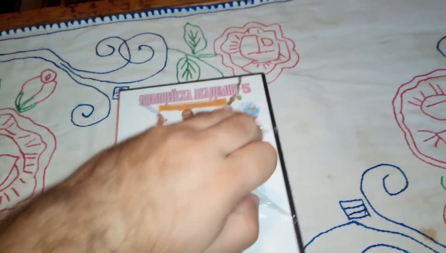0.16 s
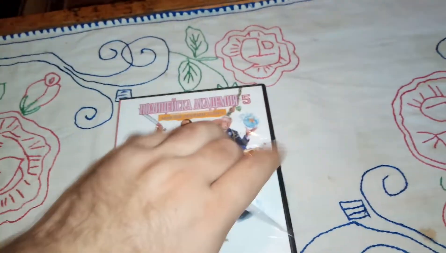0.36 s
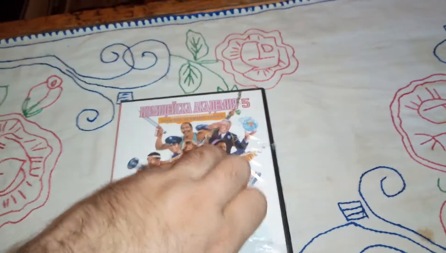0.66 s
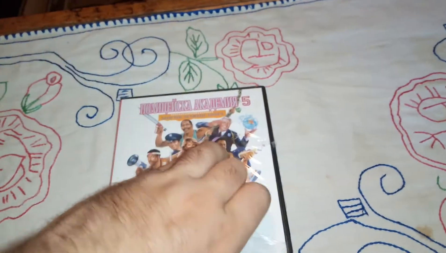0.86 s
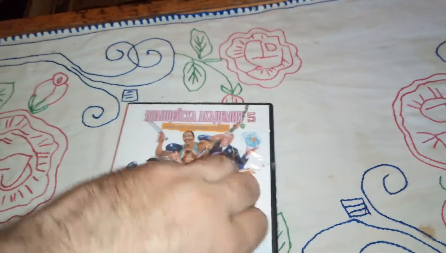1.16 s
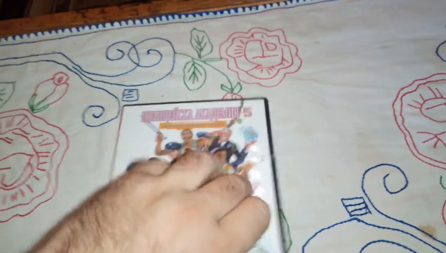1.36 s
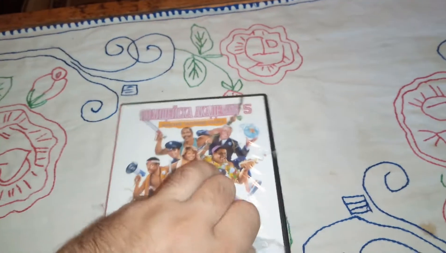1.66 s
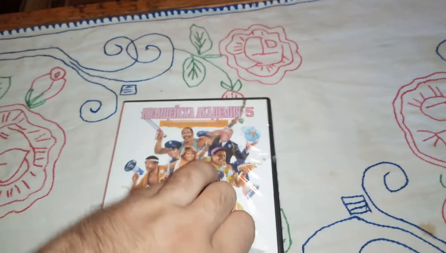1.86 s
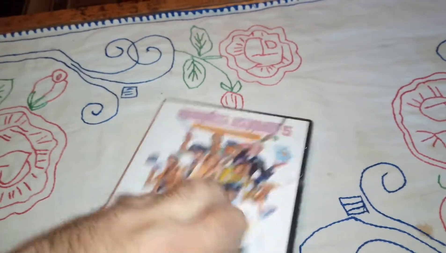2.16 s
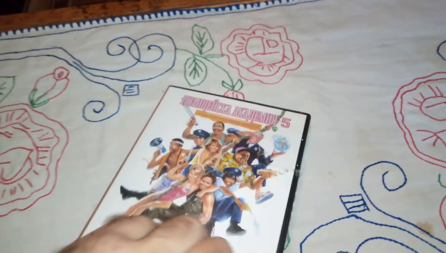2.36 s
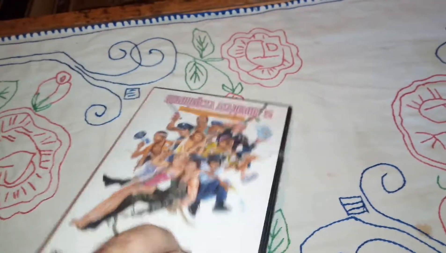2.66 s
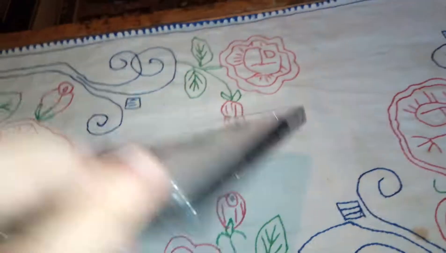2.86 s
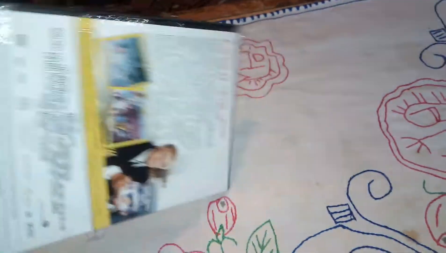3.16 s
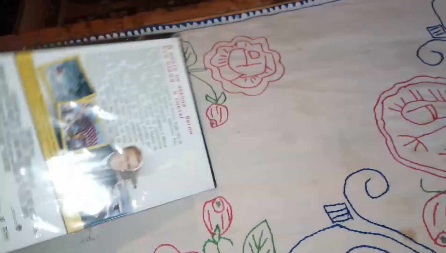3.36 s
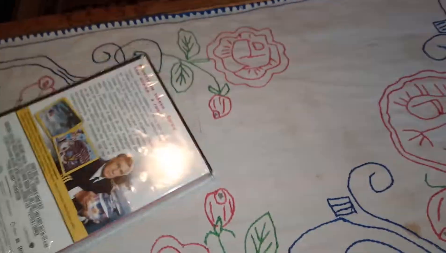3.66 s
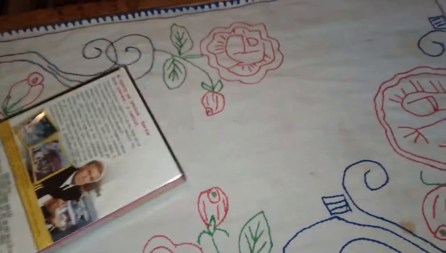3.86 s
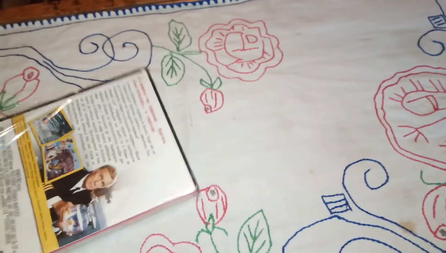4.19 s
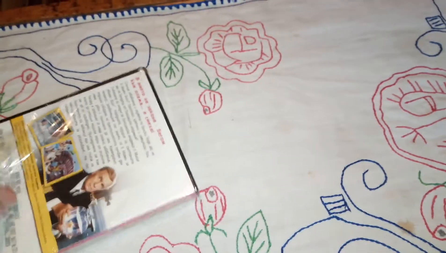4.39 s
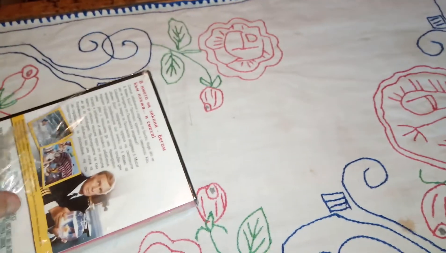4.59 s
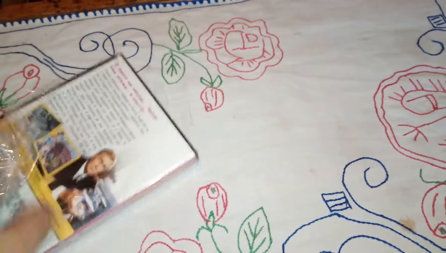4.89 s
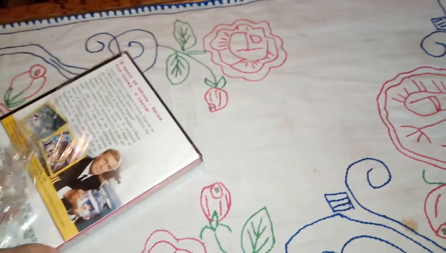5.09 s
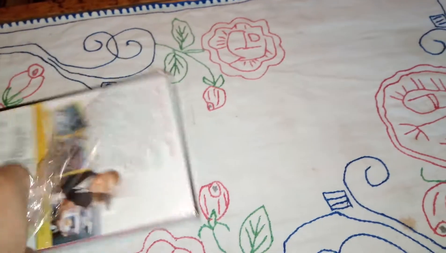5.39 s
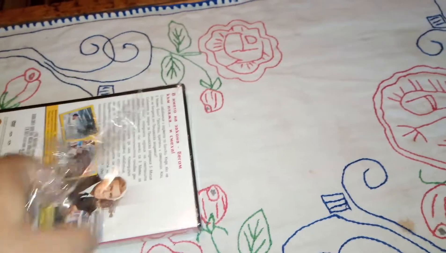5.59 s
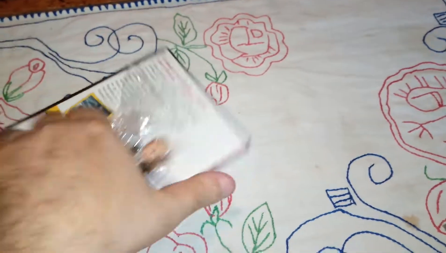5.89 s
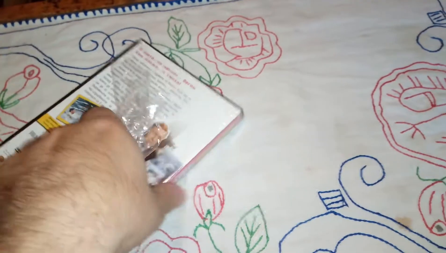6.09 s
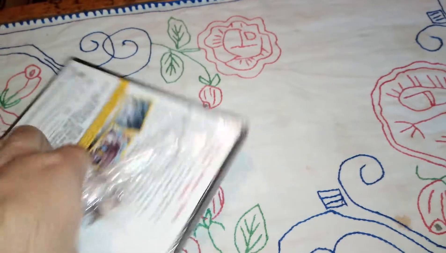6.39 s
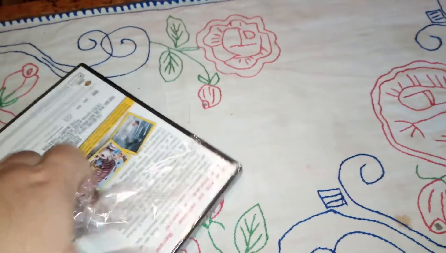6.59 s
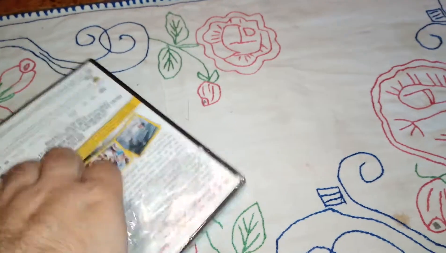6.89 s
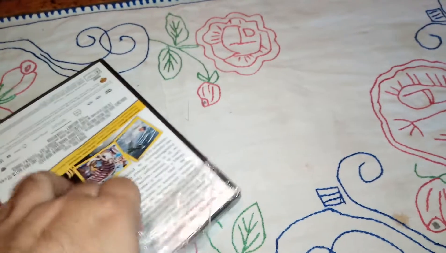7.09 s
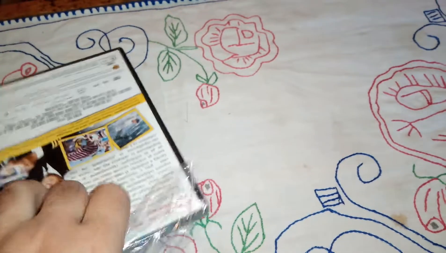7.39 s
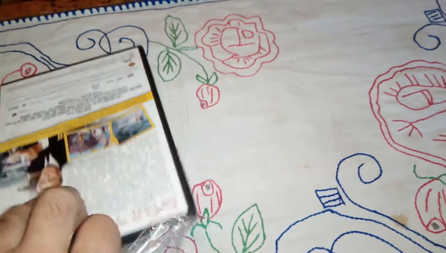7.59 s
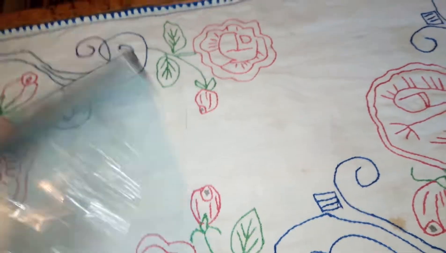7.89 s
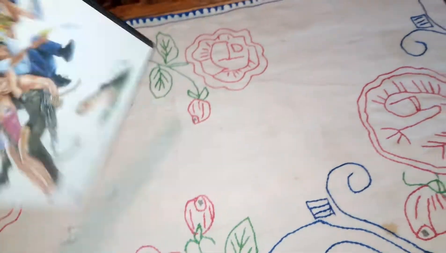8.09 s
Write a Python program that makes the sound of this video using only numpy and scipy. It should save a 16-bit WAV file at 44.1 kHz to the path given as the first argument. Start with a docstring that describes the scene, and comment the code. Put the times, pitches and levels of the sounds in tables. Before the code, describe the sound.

Hands work thin plastic film on a hollow plastic case in a quiet, small room. Sparse faint crinkles and soft rubs come first, then case clacks and brighter crackles. The crinkling grows dense and loud in the second half, with sharp snaps and one hard pop with a puff of air on the microphone just past the middle. Small, close microphone, dry sound.

```python
"""Fine crinkle in a quiet, small, dry room: hands peel shrink-wrap off a plastic disc case, close to a small microphone.
Creased film is noise under random-buckle envelopes; sharp snaps are short bursts that also ring the case.
Slipping film squeaks and swishes as roughened tones. The case slides and knocks on a cloth-covered table:
noise through shell and table resonances. One pop strikes the microphone with a puff of air."""
import sys
import numpy as np
from scipy import signal
from scipy.fft import rfft, irfft, next_fast_len
from scipy.io import wavfile
from scipy.ndimage import uniform_filter1d

SR = 44100
rng = np.random.default_rng(int(sys.argv[2]) if len(sys.argv) > 2 else 0)


def wrap_up_sound(samples):
    """Save the sound to the file named by the first command line argument, as 16-bit audio."""
    columns = np.atleast_2d(samples).T
    # keep every value between -1 and 1, then stretch to whole-number steps
    tamed = np.clip(columns, -1, 1)
    steps = np.round(tamed * 32767).astype(np.int16)
    wavfile.write(sys.argv[1], SR, steps)


N = 363686
TOP_HZ = 16300  # end of the band

# loud buckles of the film: start_s, level_db, centre_hz, breadth_octaves (Gaussian sigma)
LOUD_BUCKLES = [(0.02, -35, 4990, 2), (.134, -26.5, 2400, 4.2), (.166, -32.5, 13000, 1.7),
                (0.2846, -20.5, 5230, 0.62), (.295, -31, 12000, 2), (.302, -29, 3290, 1.6),
                (.632, -33, 3220, 3.5), (0.654, -27, 11000, 0.9), (.663, -25, 14000, 1.75),
                (.757, -26, 1760, 1.6), (.91, -27, 13850, 3.5), (.928, -26, 14000, 2.1),
                (1.139, -20, 3360, 1.24), (1.355, -27, 14000, 0.47), (1.3852, -24, 6320, 3.1),
                (1.509, -20, 700, 1.2), (1.514, -21, 840, 1.5), (1.535, -24, 3900, 3.5),
                (1.627, -22, 700, 1.9), (1.6354, -25.5, 1110, 0.93), (1.654, -22.5, 1790, 0.61),
                (1.7292, -22.5, 14000, 1.2), (1.8324, -31.5, 5600, 2.9), (1.916, -32, 5350, 1.6),
                (2.091, -36, 7100, 4.6), (2.117, -25.5, 13400, 0.55), (2.154, -24, 8100, 1.5),
                (2.16, -34, 5000, 2.2), (2.184, -22.5, 14000, 2.4), (2.206, -24.5, 9700, 8.1),
                (2.238, -15.5, 1590, 0.93), (2.262, -18.5, 1910, 0.6), (2.302, -27, 11000, 2),
                (2.353, -23, 14000, 1.5), (2.379, -23, 8640, 3), (2.39, -23, 14000, 1.3),
                (2.41, -27, 12000, 2.4), (2.426, -23, 14000, 2.2), (2.46, -30, 14000, 1.9),
                (2.4977, -25, 2700, 1.6), (2.5016, -21, 9000, 3.9), (2.546, -24.5, 13500, 0.68),
                (2.6778, -15.5, 1090, 1.1), (2.7534, -23, 9100, 2.8), (2.783, -29, 11000, 1.5),
                (2.833, -26, 11960, 2.9), (2.911, -19.5, 1900, 1.6), (2.937, -25, 700, 2),
                (2.952, -28, 14000, 1.7), (2.956, -24.5, 2500, 2.2), (3.045, -32, 13000, 1),
                (3.086, -20.5, 1630, 1.1), (3.124, -32, 13900, 2), (3.133, -24.5, 1620, 1.54),
                (3.205, -37, 9000, 2), (3.306, -27, 2740, 1.1), (3.315, -25.5, 3000, .5),
                (3.399, -23, 3060, 1.02), (3.435, -23.5, 3650, 2.2), (3.558, -22, 3870, 1),
                (3.575, -20, 2460, 0.84), (3.667, -30.5, 5300, 1.7), (3.7, -31.5, 14000, 1.9),
                (3.759, -19, 2030, 0.87), (3.7952, -21, 2060, 1), (3.8023, -14.5, 10000, 5),
                (4.033, -22.5, 2000, 1.4), (4.0363, -21.5, 2450, 1.56), (4.055, -27, 5300, .9),
                (4.1223, -25, 5600, 2), (4.186, -16.5, 1750, 0.56), (4.209, -28, 2370, .75),
                (4.2899, -33, 1000, 1.2), (4.4014, -22.5, 2090, 0.92), (4.45, -26, 8600, .4),
                (4.5121, -21.5, 1930, 0.65), (4.528, -19.5, 2400, 1.24), (4.578, -12.5, 2050, 1.26),
                (4.596, -20.5, 1210, 0.58), (4.643, -21.5, 905, 1.6), (4.662, -23.5, 3000, 0.86),
                (4.713, -20.5, 2500, 2.1), (4.754, -23, 3000, 1.2), (4.803, -19, 1560, 1.15),
                (4.8718, -17, 1890, 1.1), (4.909, -17.5, 1660, 1.08), (5.031, -21.5, 4700, 1.1),
                (5.0745, -21, 4400, 1.1), (5.123, -13.5, 1120, 1.55), (5.145, -19.5, 1900, 0.67),
                (5.199, -12, 960, 2.1), (5.214, -19, 3020, .65), (5.255, -10.5, 1560, 1.9),
                (5.2596, -19, 1820, 2.2), (5.265, -19.5, 700, 1.3), (5.27, -16, 1600, 2.4),
                (5.2765, -22, 2210, 1.3), (5.282, -25, 3500, 1.4), (5.355, -29, 9700, 3.2),
                (5.44, -18, 3030, 3.3), (5.465, -20.5, 5400, 0.66), (5.52, -20.5, 4480, 3.4),
                (5.646, -25.5, 14000, 0.41), (5.6689, -30, 1500, 3.2), (5.687, -21.5, 1800, 1.1),
                (5.701, -21, 6300, 0.44), (5.736, -17.5, 3200, 3.4), (5.744, -20.5, 5000, 0.41),
                (5.793, -19.5, 750, 0.48), (5.877, -18.5, 4050, 0.27), (5.94, -19.5, 4400, 0.6),
                (5.9865, -22, 1190, 2.2), (6.1118, -21, 2940, 1.2), (6.161, -19, 3250, 0.78),
                (6.188, -28, 7100, 1.8), (6.2353, -17, 1800, 1.44), (6.262, -23.5, 1820, 0.97),
                (6.27, -18, 2240, 0.89), (6.2761, -20, 1520, 1.5), (6.29, -20, 1800, 1.7),
                (6.318, -17, 5000, 0.79), (6.3582, -18, 960, 1.9), (6.37, -17.5, 1120, 2),
                (6.393, -15.5, 1300, 1.9), (6.396, -16, 2650, 0.25), (6.477, -25, 1997, 1.2),
                (6.529, -22.5, 1400, 1.1), (6.6075, -21, 6960, 1.2), (6.629, -26, 890, 1.2),
                (6.676, -22.5, 7060, 2.8), (6.735, -26.5, 5040, 0.83), (6.768, -29.5, 2900, 1.3),
                (6.866, -23.5, 1880, 1.2), (6.954, -16.5, 2950, 1.1), (6.971, -13, 2880, 1.4),
                (6.995, -16, 2900, 1.1), (7.015, -19.5, 2980, 4.8), (7.045, -22.5, 1500, 2.5),
                (7.1003, -21.5, 2000, 1.8), (7.11, -18.5, 3900, 1.6), (7.168, -20, 780, 1.8),
                (7.1927, -27, 2700, 2.8), (7.216, -14.5, 7600, 1.4), (7.223, -16, 2200, 2.1),
                (7.232, -20, 1330, 0.36), (7.25, -17, 6700, 3.4), (7.28, -20.5, 1200, 1.8),
                (7.303, -22, 1510, 2.4), (7.318, -20, 2080, 1.26), (7.3766, -21, 1410, 0.77),
                (7.4555, -28, 13000, 2.4), (7.509, -17.5, 5300, 3.2), (7.5505, -15.5, 4400, 0.72),
                (7.5588, -23, 3520, 1.3), (7.6096, -16, 2700, 5), (7.692, -21.5, 4100, 2.5),
                (7.708, -22.5, 14000, 1.3), (7.881, -21, 4200, 1.2), (7.9244, -18, 3200, 1.2),
                (7.983, -23, 3000, 1.04), (8.107, -27, 5000, 1.4), (8.136, -29, 2700, 0.57),
                (8.177, -28, 13900, 2.6)]
# resonances of the hollow case: centre_hz, width_hz, level_db
SHELL_MODES = [(449, 56, -4), (642, 74, 2.5), (772, 136, -0.5), (1137, 80, -4.5), (1446, 105, -12),
               (1840, 70, -6), (2300, 45, -7), (2950, 44, -4.5), (3624, 85, -3), (4900, 1440, -19.5)]
# resonances of the table under its cloth: centre_hz, width_hz, level_db
TABLE_MODES = [(90.4, 14.6, -1.5), (138, 16.3, 0.5), (198, 35, -4.5), (273.6, 38, -4), (345, 45, -13),
               (422, 45, -12)]


def amp(db):
    """Decibels to gain."""
    return 10 ** (np.asarray(db) / 20)


def unit(x):
    """Scale to rms 1."""
    return x / np.sqrt(np.mean(x ** 2) + 1e-20)


def sized(x, span_s):
    """Scale a short sound to the energy of rms 1 held for span_s."""
    return x / np.sqrt(np.sum(x ** 2) / (span_s * SR) + 1e-20)


def along(points, hz):
    """Interpolate (Hz, value) points on a log axis."""
    f, v = np.transpose(points)
    return np.interp(np.log(hz + 1), np.log(f + 1), v)


def curves(rows):
    """One value per sample for each column after the time."""
    s, *cols = np.transpose(rows)
    return [np.interp(np.arange(N) / SR, s, c) for c in cols]


def add(track, s, sound):
    """Mix a sound into the track at time s."""
    part = track[max(0, round(s * SR)):][:len(sound)]
    part += sound[:len(part)]


def filtered(x, response):
    """x times a complex response of frequency."""
    m = 2 * next_fast_len(N // 2 + SR // 4)
    return irfft(rfft(x, m) * response(np.fft.rfftfreq(m, 1 / SR)), m)[:N]


def causal(gain):
    """Minimum-phase response with this gain: sharp attack, ringing after it."""
    cepstrum = irfft(np.log(np.maximum(gain, 1e-6)))
    half = len(cepstrum) // 2
    return np.exp(rfft(np.r_[cepstrum[0], 2 * cepstrum[1:half], np.zeros(half)]))


def body(modes, hz):
    """Sum of band-pass resonances of alternating sign."""
    total = 0
    for k, (c, w, db) in enumerate(modes):
        total = total + (-1) ** k * amp(db) * 1j * hz * w / (c * c - hz * hz + 1j * hz * w)
    return total


def quiet_floor(level_db=-57):
    """Steady noise of the quiet room."""
    # spectrum: freq_hz, density_db
    quiet_spectrum = [(25, 4.5), (80, -2), (200, 0), (600, -16), (1200, -9), (2000, -5), (4000, -13),
                      (8000, -46), (11000, -23), (16000, -17.5)]
    noise = rng.standard_normal(N)
    return amp(level_db) * unit(filtered(noise, lambda hz: amp(along(quiet_spectrum, hz))))


def stroke(start_s, length_s, attack_s, onset_db, release_s):
    """Gain of one hand movement: takes hold, drifts from onset_db to 0 dB, lets go exponentially."""
    gain = np.zeros(N)
    t = np.arange(round((length_s + 8 * release_s) * SR)) / SR
    drift = amp(onset_db * (1 - np.minimum(t / length_s, 1)))
    release = np.exp(-np.maximum(t - length_s, 0) / release_s)
    add(gain, start_s, np.minimum(t / attack_s, 1) * drift * release)
    return gain


def effort(attack_s=0.012, onset_db=3.5, release_s=0.017):
    """Gains of rubbing, crinkle and fizz: pulls add in power to the creasing in the grip."""
    # pulls or sweeps of the fingers, relative levels: start_s, length_s, case_rub_db, crinkle_db, fizz_db
    pull_rows = [(0.184, 0.15, -49.5, -44.5, -44), (0.433, 0.027, -49, -50.5, -58),
                 (0.609, .1, -50, -51.5, -42.5), (0.756, 0.026, -38.5, -46, -44),
                 (0.955, 0.12, -51.5, -51, -49.5), (1.099, 0.076, -39.5, -43.5, -43),
                 (1.327, 0.13, -43, -60, -52), (1.478, 0.21, -36, -40, -44),
                 (1.746, 0.035, -51, -40.5, -37), (2.218, 0.091, -30, -40, -34),
                 (2.323, 0.11, -38.5, -44, -55), (2.583, 0.017, -50, -35.5, -34),
                 (2.674, 0.087, -36, -45, -53), (2.793, 0.13, -42, -41, -36.5), (3.03, .1, -43, -46, -42),
                 (3.299, 0.095, -46, -50, -48), (3.477, .1, -49, -35.5, -37), (3.795, .14, -36.5, -38, -39),
                 (3.978, 0.15, -47, -35, -36.5), (4.154, 0.052, -37, -28.5, -30.5),
                 (4.272, 0.093, -38.5, -32.5, -37), (4.43, 0.2, -66, -47, -40),
                 (4.569, 0.25, -49, -33, -33.5), (4.826, .1, -41, -31.5, -37),
                 (4.992, 0.18, -36.5, -36.5, -37), (5.212, 0.05, -52, -28.5, -35),
                 (5.251, 0.043, -34, -25.5, -27), (5.313, 0.035, -36.5, -32, -34),
                 (5.487, 0.1, -37, -34, -33), (5.65, 0.14, -56, -35.5, -34.5), (5.735, 0.11, -37, -31, -31),
                 (5.996, 0.066, -41, -31, -34.5), (6.125, .08, -46, -41.5, -44),
                 (6.251, 0.025, -27, -29, -33), (6.322, 0.17, -34.5, -32, -35.5),
                 (6.514, 0.14, -32.5, -34, -47), (6.638, 0.12, -58, -40, -42),
                 (6.842, 0.071, -37.5, -35, -46), (6.981, 0.079, -35, -28.5, -33),
                 (7.118, 0.06, -43, -35, -36), (7.24, .11, -39, -37, -40), (7.394, 0.048, -40, -37.5, -37),
                 (7.471, 0.24, -42.5, -33.5, -32.5), (7.744, 0.2, -46, -35, -36.5),
                 (8.052, 0.02, -42, -38.5, -39), (8.229, .03, -38.5, -58, -59)]
    # creasing in the grip between pulls, relative levels: time_s, case_rub_db, crinkle_db, fizz_db
    grip_rows = [(0, -55, -46, -47), (.33, -58, -48.5, -56), (.41, -70, -58, -72), (.53, -49.5, -53, -48),
                 (.87, -60, -62, -64), (1.15, -51, -47, -48), (1.72, -56, -46, -49),
                 (2.02, -60.5, -56.5, -55), (2.22, -41, -39.5, -38), (2.56, -49.5, -45, -45.5),
                 (3, -44, -44, -44), (3.3, -54, -47.5, -48), (4.6, -48.5, -38.5, -38.5),
                 (5.92, -48, -39.5, -40), (6.6, -43, -37.5, -38.5), (6.83, -50.5, -53, -50),
                 (7.1, -40, -31.5, -33), (8.22, -54.5, -48, -53.5)]
    pulls = np.array([stroke(s, length, attack_s, onset_db, release_s) for s, length, *_ in pull_rows])
    pull_gains = amp(np.array(pull_rows)[:, 2:].T)
    return np.sqrt(amp(curves(grip_rows)) ** 2 + pull_gains ** 2 @ pulls ** 2)


def creases(rate_hz, spread_db, life_s, smooth):
    """Envelope of tiny random buckles of unequal power, over a smooth share (0-1) of sliding."""
    chance = rng.random(N)
    size = np.minimum(rng.exponential(size=N), 3)
    power = (chance < rate_hz / SR) * amp(spread_db * size) ** 2
    power = signal.lfilter([1], [1, -np.exp(-1 / (life_s * SR))], power)
    # level out the slow swings
    power = power / (np.abs(uniform_filter1d(power, size=2600)) + power.mean() / 10)
    share = np.clip(smooth, 0, 1)
    return unit(np.sqrt(share + (1 - share) * power))


def facets(x, depth_db):
    """Facets of changing size each favour their own bands for a few milliseconds."""
    z = signal.stft(x, nperseg=256)[2]
    field = uniform_filter1d(rng.standard_normal(z.shape), size=6, axis=0)
    field = uniform_filter1d(field, size=3, axis=1)
    return signal.istft(z * amp(depth_db * np.clip(unit(field), -2, 2)), nperseg=256)[1][:N]


def crinkle_dips(dip_s=0.01, depth_db=-10, large_db=-23):
    """The crinkle dips for about 10 ms before a large buckle, as the taut film holds still before it gives way.
    The dip is full from 6 dB above large_db."""
    dip = np.zeros(N)
    for s, db, *_ in LOUD_BUCKLES:
        add(dip, s - dip_s, np.clip((db - large_db) / 6, 0, 1) * np.ones(round(dip_s * SR)))
    return amp(depth_db * uniform_filter1d(np.minimum(dip, 1), size=80))


def wrap(rub, crinkle, fizz, rub_db=-3.0, crinkle_db=-0.7, fizz_db=-4.5):
    """Fine creases crackle in the film, and its drag sounds the case beneath."""
    # spectra: freq_hz, density_db
    crinkle_spectrum = [(200, -15.5), (600, -15), (1300, -2), (2300, 1), (3800, -0.5), (6000, -6),
                        (8000, -11.5), (11000, -34), (16000, -46)]
    fizz_spectrum = [(3000, -33), (6500, 4.5), (9000, 0), (11000, 0.5), (15000, 1), (17000, -6)]
    shared = creases(rate_hz=420, spread_db=5.0, life_s=0.0008, smooth=0.12)
    tiny = creases(rate_hz=500, spread_db=5.0, life_s=0.00014, smooth=0.014)
    drag = creases(rate_hz=330, spread_db=10.5, life_s=0.0018, smooth=0.032)

    def grains(envelope, gain):
        noise = envelope * rng.standard_normal(N)
        return unit(filtered(noise, lambda hz: causal(gain(hz))))

    shell = grains(drag + shared, lambda hz: np.abs(body(SHELL_MODES, hz)) / np.hypot(1, (hz / 1700) ** 2))
    middle = grains(shared, lambda hz: amp(along(crinkle_spectrum, hz)))
    middle = unit(facets(middle, depth_db=3.2))
    top = grains(np.hypot(shared, tiny), lambda hz: amp(along(fizz_spectrum, hz)))
    mix = rub * amp(rub_db) * shell + crinkle * amp(crinkle_db) * middle + fizz * amp(fizz_db) * top
    return crinkle_dips() * mix


def ticks(crinkle, per_s=30, over_crinkle_db=2.5, range_db=6, mid_hz=3770, range_octaves=2, breadth_octaves=1.7):
    """Lesser buckles, one at random in each time slot, louder under a harder pull; rows as LOUD_BUCKLES."""
    rows = []
    for k, (when, strength, size) in enumerate(rng.uniform(-1, 1, (600, 3))):
        s = (k + (when + 1) / 2) / per_s
        if s < N / SR:
            db = 20 * np.log10(crinkle[int(s * SR)]) + over_crinkle_db + range_db * strength
            rows.append((s, db, mid_hz * 2 ** (range_octaves * size), breadth_octaves))
    return rows


def onset_ticks(mean_lead_s=.0035, mean_db=-14.5, range_db=6):
    """A fainter tick of random level a few milliseconds before each loud buckle softens its onset;
    rows as LOUD_BUCKLES."""
    chance = rng.uniform(-1, 1, (len(LOUD_BUCKLES), 2))
    rows = []
    for (s, db, centre_hz, breadth), (early, strength) in zip(LOUD_BUCKLES, chance):
        lead_s = mean_lead_s * (1 + early / 2)
        rows.append((s - lead_s, db + mean_db + range_db * strength, centre_hz, breadth))
    return rows


def snaps(buckles, min_crack_s=0.00044, flutter_s=0.0018, flutter_db=-12, skirt_db=-27, shell_db=-7):
    """Each buckle cracks, flutters and rings the case; large facets sound lower and flip more slowly."""
    count = 2048
    out, t, hz = np.zeros(N), np.arange(count) / SR, np.fft.rfftfreq(count, 1 / SR)
    case = 1 + amp(shell_db) * body(SHELL_MODES, hz)
    for s, db, centre_hz, breadth in buckles:
        slowness = np.clip(np.sqrt(4000 / centre_hz), 1, 2)
        rise = 1 - np.exp(-t / (.00025 * slowness))
        crack = np.exp(-t / (min_crack_s * slowness))
        flutter = amp(flutter_db) * np.exp(-t / flutter_s)
        burst = rise * (crack + flutter) * rng.standard_normal(count)
        facet = np.exp(-(np.log2((hz + 1) / centre_hz) / breadth) ** 2 / 2)
        facet = facet + amp(skirt_db) * hz / (hz + 500)
        facet = facet * np.where(hz < TOP_HZ, 1, 1 / 20)
        click = irfft(rfft(burst) * causal(facet) * case)
        add(out, s, amp(db) * sized(click, span_s=0.0034))
    return out


def slips(overtone_db=-11):
    """Taut film slips, swishes or tears: it sings roughly, at a pitch that follows its tension."""
    # start_s, length_s, first_hz, last_hz, width_hz, level_db
    slip_rows = [(0.065, 0.036, 685, 1700, 500, -45.5), (0.196, .085, 520, 507, 130, -40.5),
                 (.62, .1, 13800, 14300, 3000, -48), (0.667, 0.071, 4850, 5000, 900, -50),
                 (1.842, 0.034, 542, 560, 121, -48), (2.696, 0.06, 1116, 703, 350, -39),
                 (2.986, .08, 373, 310, 100, -41), (3.022, 0.052, 12500, 13000, 2500, -42),
                 (3.095, 0.035, 13000, 13800, 2500, -38), (3.328, 0.071, 2250, 2500, 250, -40.5),
                 (3.329, 0.069, 1250, 1130, 200, -49), (3.496, .047, 3150, 1344, 500, -31.5),
                 (3.513, 0.037, 1170, 785, 200, -39), (5.253, 0.0064, 2130, 2210, 300, -12.5),
                 (5.243, 0.0048, 7000, 5040, 6950, -27), (7.768, 0.12, 844, 948, 500, -36),
                 (7.869, .06, 1100, 2430, 600, -44), (7.946, .08, 1490, 920, 600, -46),
                 (8.025, .06, 1490, 2220, 700, -41)]
    out = np.zeros(N)
    for s, length, first_hz, last_hz, width_hz, db in slip_rows:
        count = round(length * SR)
        lowpass = signal.butter(2, width_hz / 2, fs=SR, output="sos")
        rough = signal.sosfilt(lowpass, rng.standard_normal((3, SR // 4)))[:, -count:]
        phase = 2 * np.pi * np.cumsum(np.geomspace(first_hz, last_hz, count)) / SR
        overtone = amp(overtone_db) * (2 * first_hz < TOP_HZ) * rough[2] * np.sin(2 * phase)
        squeak = rough[0] * np.sin(phase) + rough[1] * np.cos(phase) + overtone
        fade = np.linspace(1, .5, count) * signal.windows.tukey(count, .25)
        add(out, s, amp(db) * unit(squeak * fade))
    return out


def handling(gain_db=-1, cloth_db=-17, attack_s=0.014, onset_db=-4, release_s=0.043):
    """Hands shove the case over the cloth in soft jolts that the table passes on."""
    # relative levels: start_s, length_s, rumble_db
    shove_rows = [(0.075, 0.15, -41.5), (0.432, 0.015, -50.5), (0.647, 0.12, -52), (0.957, .06, -49),
                  (1.07, 0.16, -45.5), (1.313, 0.38, -47), (2.073, 0.042, -48), (2.233, .12, -39.5),
                  (2.436, 0.11, -57), (2.598, 0.31, -48.5), (2.867, 0.33, -43.5), (3.58, 0.36, -51),
                  (4.12, .23, -51), (4.58, 0.51, -46.5), (5.144, 0.67, -46.5), (5.988, 0.058, -44),
                  (6.222, .39, -41.5), (6.833, 0.48, -48.5), (7.277, .17, -40.5), (7.775, 0.19, -47),
                  (8.033, .17, -58), (8.225, 0.023, -43)]
    jolts = creases(rate_hz=53, spread_db=-1, life_s=0.0021, smooth=0.45) * rng.standard_normal(N)

    def table(hz):
        wood = np.abs(body(TABLE_MODES, hz)) / np.hypot(1, (hz / 600) ** 2)
        cloth = amp(cloth_db) * hz / (hz + 80) / np.hypot(1, (hz / 450) ** 3)
        return causal(wood + cloth)

    push = np.zeros(N)
    for s, length, db in shove_rows:
        push += amp(db + gain_db) * stroke(s, length, attack_s, onset_db, release_s)
    return push * unit(filtered(jolts, table))


def rocking(count=4, rebound_s=.018):
    """The bumped case rocks, each contact weaker: (s, thud dB, centre Hz, clack dB) per contact."""
    # start_s, table_thud_db, thud_centre_hz, shell_clack_db, loss_per_rebound_db
    knock_rows = [(.131, -35.5, 145, -46, 16), (.225, -42, 195, -45, 11), (1.138, -35, 98.5, -38, 10),
                  (1.492, -24, 480, -26.5, 19), (1.508, -33, 400, -27, 12), (1.602, -33, 159, -26, 28),
                  (1.634, -38, 330, -28.5, 5.5), (2.231, -28.5, 167, -24, 4), (2.38, -46, 150, -32, 18),
                  (2.634, -54, 410, -30.5, 21), (2.671, -33, 150, -30, 17), (2.881, -24.5, 231, -30.5, 26),
                  (2.895, -29.5, 237, -27, 5.5), (2.991, -36.5, 260, -44, 16), (3.041, -36.5, 262, -56, 8),
                  (3.132, -40, 217, -41, 12), (3.577, -37, 109, -33, 8.5), (3.638, -50, 220, -35, 23),
                  (3.69, -54, 290, -37.5, 21), (3.738, -59, 430, -30.5, 14), (3.87, -42, 440, -28, 14),
                  (3.898, -60, 420, -30, 13), (3.935, -55, 420, -35, 16), (4.191, -54, 270, -35, 18),
                  (4.262, -46, 423, -33, 18), (4.285, -46, 440, -28, 18), (4.576, -46, 200, -31, 18),
                  (5.79, -42, 314.6, -39, 18), (6.579, -38, 370, -26, 9), (6.819, -39.5, 91, -49, 11),
                  (7.167, -47.5, 270, -37, 20), (7.365, -31, 170, -43, 18), (7.378, -39, 230, -27.5, 20),
                  (7.392, -32, 199, -29, 6), (7.918, -41.5, 120, -55, 21)]
    return [(s + k * rebound_s, thud - k * loss, centre_hz, clack - k * loss)
            for s, thud, centre_hz, clack, loss in knock_rows for k in range(count)]


def knocks(contact_s=0.0019, settle_s=0.0039, breadth_octaves=0.97, light_db=9):
    """A blow rattles the shell and thuds into the table; the lighter the tap, the more the lid rings instead."""
    # lid, tapped on its own: centre_hz, width_hz, level_db
    lid_modes = [(468, 17, -11), (754, 63, 0.5), (1255, 77, -14), (2450, 200, -13), (3660, 105, -2.5)]
    count = 8192
    out, t, hz = np.zeros(N), np.arange(count) / SR, np.fft.rfftfreq(count, 1 / SR)

    def struck(modes):
        # mode levels vary from blow to blow
        return body([(c, w, db + 2 * rng.standard_normal()) for c, w, db in modes], hz)

    def blow(life_s, response):
        burst = np.exp(-t / life_s) * rng.standard_normal(count)
        return sized(irfft(rfft(burst) * response), span_s=0.025)

    for s, thud_db, centre_hz, clack_db in rocking():
        # a soft blow favours low modes
        softness = causal(np.exp(-(np.log2((hz + 1) / centre_hz) / breadth_octaves) ** 2 / 2) + 1 / 100)
        light = np.clip((clack_db - thud_db - light_db) / 10, 0, 1)
        shell = np.sqrt(1 - light) * blow(contact_s, struck(SHELL_MODES))
        lid = np.sqrt(light) * blow(contact_s, struck(lid_modes))
        thud = blow(settle_s, struck(TABLE_MODES) * softness)
        add(out, s, amp(thud_db) * thud + amp(clack_db) * (shell + lid))
    return out


def pop(start_s=5.1986, push_s=0.00055, corner_hz=75, push_db=-4):
    """The wrap gives way: one push of air, which a high-pass makes swing back and settle."""
    out, u = np.zeros(N), np.arange(SR // 20) / SR / push_s
    add(out, start_s, -amp(push_db) * u * np.exp(1 - u))
    return filtered(out, lambda hz: -hz ** 2 / (corner_hz ** 2 - hz ** 2 + 1.1j * hz * corner_hz))


def room(x):
    """A tail from the walls, 5 ms late: noise decaying at a rate set by frequency."""
    # freq_hz, t60_s
    decay_times = [(200, 0.22), (2000, 0.36), (12000, 0.089)]
    hz, t, z = signal.stft(rng.standard_normal(SR // 3), SR, nperseg=256)
    decay = amp(-60 * t / along(decay_times, hz)[:, None])
    tail = signal.istft(z * decay, SR, nperseg=256)[1]
    return signal.fftconvolve(x, np.r_[np.zeros(SR // 200), tail] / np.linalg.norm(tail))[:N]


def scene(room_db=-16):
    """Wrap, case and table in a quiet room; the puff of air reaches only the microphone."""
    rub, crinkle, fizz = effort()
    buckles = LOUD_BUCKLES + onset_ticks() + ticks(crinkle * crinkle_dips())
    near = wrap(rub, crinkle, fizz) + snaps(buckles) + slips() + handling() + knocks()
    return (near + pop() + amp(room_db) * room(near) + quiet_floor())[None]


def record(dry):
    """The port colours the sound by direction, the largest peaks are rounded off, and the band ends."""
    # where the film is worked: time_s, side_share (0-1)
    side_rows = [(2.9, 0.64), (3.3, 0.8), (3.7, 1), (4.4, 1), (4.65, 0.85)]
    # microphone colour, ahead and from the side: freq_hz, gain_db
    front_colour = [(20, -7), (70, -4), (6500, 2), (8000, -19.5), (9200, -2), (10700, 8), (12000, 9),
                    (13800, -5), (15100, 10.5), (15700, -1), (16300, -28)]
    side_colour = [(20, -7), (70, 1), (6300, -3), (7600, -3), (8600, -1), (10500, 8.5), (12000, -0.5),
                   (14000, -6), (15300, 2), (16300, -20.5)]

    def port(colour):
        return filtered(dry[0], lambda hz: causal(amp(along(colour, hz))))

    aside = np.clip(curves(side_rows)[0], 0, 1)
    x = (1 - aside) * port(front_colour) + aside * port(side_colour)
    x = x / (1 + np.abs(x / .8) ** 4) ** (1 / 4)
    return filtered(x, lambda hz: 1 / np.hypot(1, (hz / TOP_HZ) ** 120))[None]


dry = scene()
out = record(dry)
wrap_up_sound(out)
```